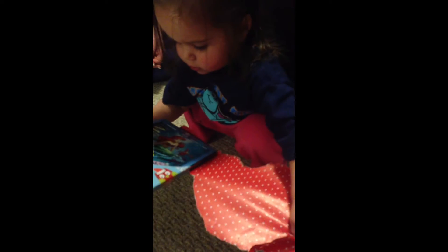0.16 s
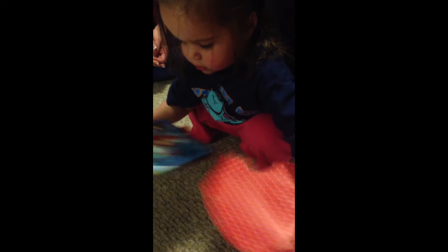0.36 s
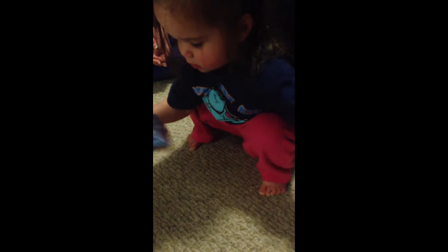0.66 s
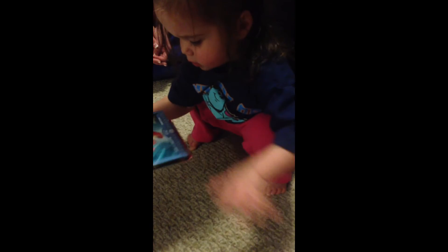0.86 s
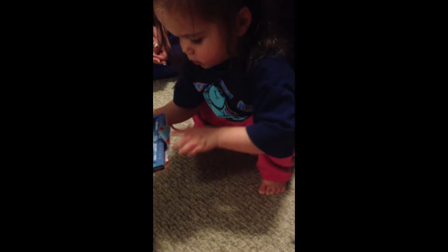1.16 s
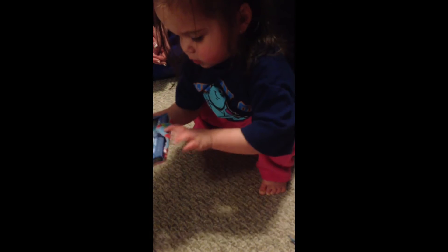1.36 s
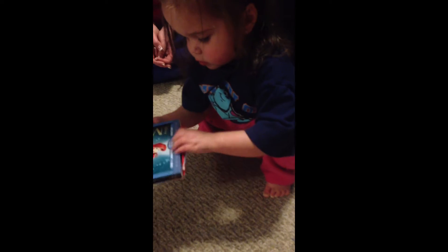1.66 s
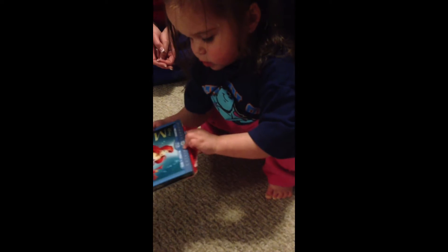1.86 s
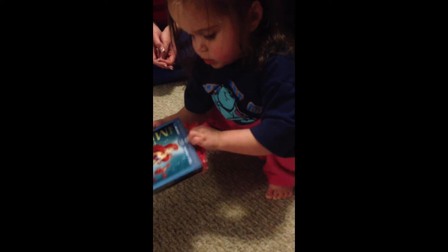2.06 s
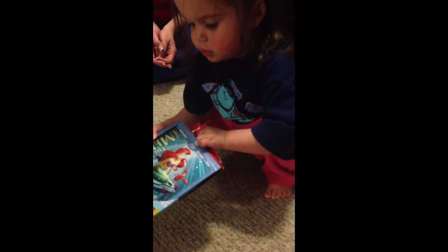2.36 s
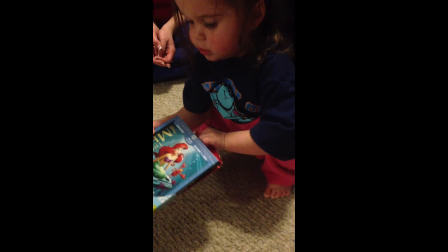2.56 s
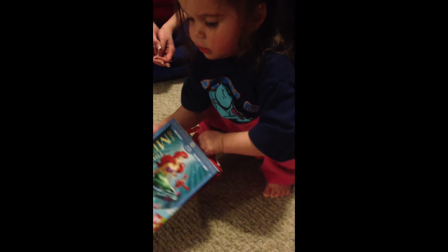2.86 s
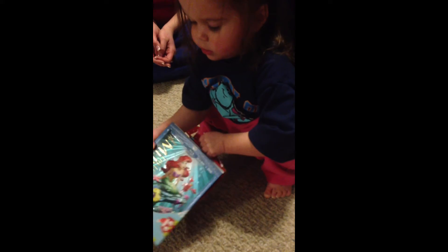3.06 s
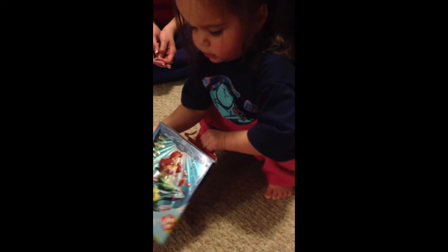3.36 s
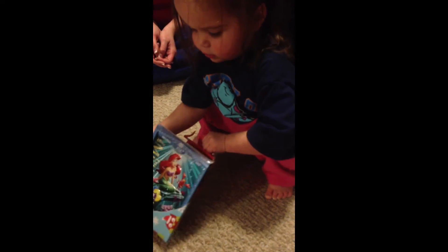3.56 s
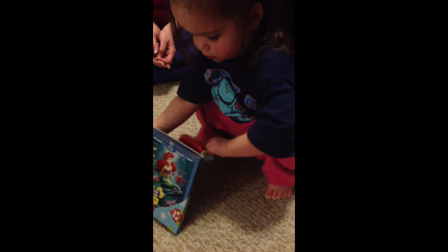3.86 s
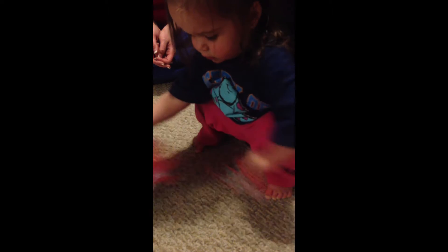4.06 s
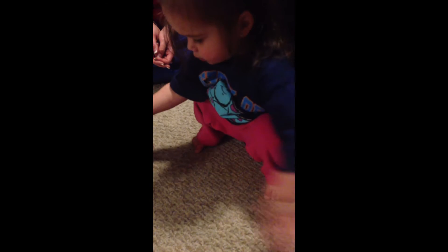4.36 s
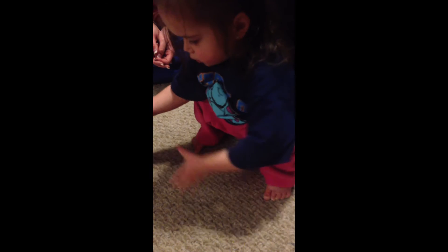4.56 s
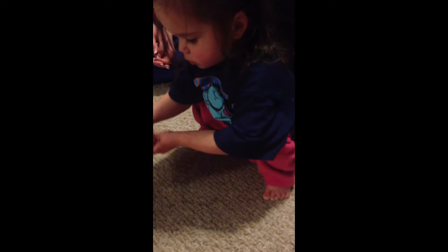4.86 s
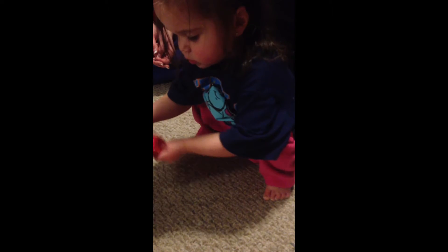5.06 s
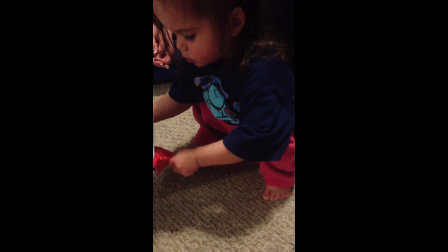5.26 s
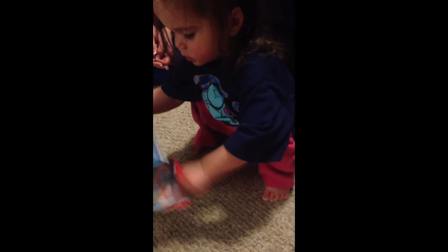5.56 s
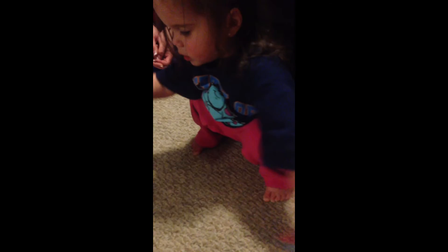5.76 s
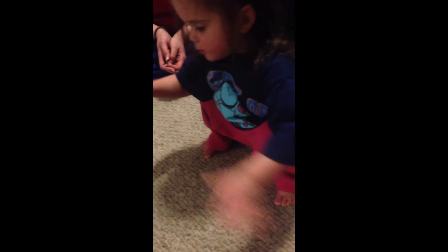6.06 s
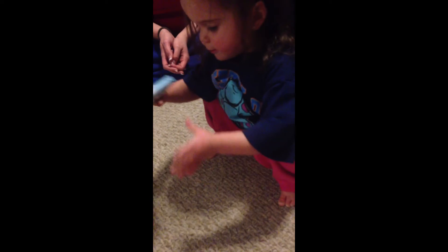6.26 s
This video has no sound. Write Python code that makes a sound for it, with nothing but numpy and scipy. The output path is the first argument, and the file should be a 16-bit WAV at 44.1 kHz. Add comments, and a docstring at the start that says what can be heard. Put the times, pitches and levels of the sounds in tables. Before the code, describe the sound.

A short, sharp tear of wrapping paper opens, followed by dull, gentle thuds of knees and feet on carpet. Creases snap and the paper rustles while fingers tick against a plastic case. Another brief rip comes past the middle, then busier crinkling with quick tears and a few more soft thuds. The sound is close and fairly dry, on a small microphone in a living room with a low, steady hum.

```python
"""A quiet, carpeted living room: a child pulls wrapping paper off a plastic disc case.
Each short rip is a run of breaking fibres that crack, rasp and shake the loose sheet.
Between rips, creases snap, the paper rustles, fingers tap the case and knees and feet bump the floor.
An appliance hums over steady room noise."""
import sys
import numpy as np
from scipy import signal
from scipy.fft import rfft, irfft
from scipy.io import wavfile
from scipy.ndimage import uniform_filter1d

SR = 44100
rng = np.random.default_rng(int(sys.argv[2]) if len(sys.argv) > 2 else 0)


def transcribe(signal):
    """Save signal, clipped to [-1, 1], as a 16-bit WAV file at the path in sys.argv[1]."""
    frames = np.atleast_2d(signal).T
    limited = np.clip(frames, -1, 1)
    pcm = np.round(limited * 32767).astype(np.int16)
    wavfile.write(sys.argv[1], SR, pcm)


N = 283122


# Each row: start in s, end in s, final level in dB, swell up to it in dB, drop on letting go in dB,
# then sheet flap, rasp and fizz in dB re the level, sheet pitch in Hz.
TEARS = [(0.307, 0.3661, -27, 8.5, 16, -10, -10, -17.5, 332),
         (3.848, 3.878, -48.5, 0.5, -5, -22, -3, -26, 570),
         (3.895, 4.006, -28.5, 6.5, 1.5, -10.5, -5.5, -20, 470),
         (5.359, 5.38, -36.5, 3.5, 2.5, -7, -0.5, -24, 620),
         (5.504, 5.557, -27.5, 17.5, 4.5, -8.5, -3, -21.5, 465),
         (5.6104, 5.632, -38, -2.5, 11, -16.5, -4, -18, 500)]
def rip(start_s, end_s, top_db, swell_db, drop_db, flap_db, rasp_db, fizz_db, sheet_hz):
    """A tear runs through the fibres as the pull builds; each break cracks, rasps and tugs the sheet."""
    let_go_s, crackle_fade_db_per_s, shake_fade_db_per_s = 0.0087, 440, 394
    flap_growth_db, fizz_growth_db = 6, 4  # more sheet comes free, the tear quickens
    t = np.arange(start_s, end_s + 0.1, 1 / SR)
    share_left = np.maximum(end_s - t, 0) / (end_s - start_s)
    after_s = np.maximum(t - end_s, 0)
    pull_db = top_db - swell_db * share_left - drop_db * np.minimum(after_s / let_go_s, 1)
    crackle_db = pull_db - crackle_fade_db_per_s * after_s
    shake_db = pull_db - shake_fade_db_per_s * after_s
    sizzle_db = crackle_db + fizz_db - fizz_growth_db * share_left
    breaks = fibres(len(t), per_s=2800)
    shaking = signal.fftconvolve(breaks, sheet())[:len(t)]
    tugs = unit_rms(resonate(shaking, sheet_hz, width_hz=350))
    tugs *= amp(shake_db + flap_db - flap_growth_db * share_left)
    out = np.zeros(len(t) + 1024)
    add(out, 0, tugs * signal.windows.tukey(len(t), 0.04))
    # About 300 times a second the tear switches among eight timbres.
    switches = np.cumsum(rng.random(len(t)) < 300 / SR)
    timbre = rng.integers(0, 8, len(t))[switches % len(t)]
    for k, shift in enumerate(rng.standard_normal(8)):
        bright = crack(6400 * np.exp(0.2 * shift), ring_share=0.98)
        voices = [(bright, crackle_db - 1), (rasp(), shake_db + rasp_db), (fizz(), sizzle_db)]
        for colour, db in voices:
            add(out, 0, signal.fftconvolve(breaks * (timbre == k) * amp(db), colour))
    # One snap opens the tear; another ends it as the freed sheet jerks.
    catch_db = top_db - swell_db + 20
    add(out, 0, snap(catch_db, 7100, rasp_db - 13, thump_db=catch_db + THUMP_RE_CRACK_DB))
    add(out, end_s - start_s, snap(top_db + 18, 7100, rasp_db, thump_db=top_db + flap_db + 20))
    return out


THUMP_RE_CRACK_DB = -16.5
def snap(level_db, ring_hz, rasp_db, thump_db):
    """A crease buckles with a sharp tip and a bright crack; the folds and the sheet answer more slowly."""
    out = np.zeros(1500)
    add(out, 0, amp(level_db - 22) * slips(fizz(), rise_s=0.00034))
    add(out, 0, amp(level_db) * slips(crack(ring_hz, ring_share=0.93), rise_s=0.00099))
    add(out, 0, amp(level_db + rasp_db) * slips(rasp(), rise_s=0.0023))
    add(out, 0, amp(thump_db) * unit_energy(np.convolve(sheet(), mode(hz=562, t60_s=0.01))))
    return out


# Each row: start in s, crack level in dB, ring in Hz, rasp in dB re the crack.
CREASE_POPS = [(0.177, -19.5, 7100, -15), (0.3325, -7, 7040, -9), (0.3583, -12.5, 7150, -3.5),
               (1.5531, -37, 7090, -4), (2.0433, -27, 6500, -3), (2.088, -10, 6860, -23),
               (2.5057, -18.5, 7100, -10), (2.9045, -26, 7700, -3), (3.046, -35.5, 7240, -4),
               (3.157, -21, 7400, -7.5), (3.1986, -25, 5940, -6), (3.2358, -8, 7100, -19.5),
               (3.4653, -33, 6350, -10), (3.5232, -18.5, 8300, -14), (3.5923, -26, 6650, -8.5),
               (3.679, -22, 7440, -10.5), (3.8, -18, 7100, -13.5), (3.8818, -9.5, 6600, -5),
               (3.9053, -11.5, 6300, 3), (3.923, -9.5, 7070, 0), (3.985, -7, 7000, -17),
               (4.2176, -28, 7340, -27), (4.8123, -34, 6800, 2.5), (4.8743, -22, 6250, -12),
               (5.061, -29.5, 6100, -8), (5.13, -20, 6700, -3.5), (5.1386, -23, 6800, -7),
               (5.2374, -33, 7000, 7.5), (5.2507, -34, 6000, 13), (5.3095, -9.5, 7300, -6.5),
               (5.319, -17, 6300, -11), (5.3274, -14, 7020, -9), (5.3376, -14, 6800, -8),
               (5.3999, -13.5, 7100, -24), (5.5145, -13, 6790, -19), (5.5413, -11, 6600, -1),
               (5.741, -28.5, 7240, -3), (6.0533, -29.5, 6800, -5.5), (6.115, -20.5, 7200, -2.5)]
def creases():
    """Single creases pop, each nudging the whole sheet."""
    out = np.zeros(N)
    for start_s, level_db, ring_hz, rasp_db in CREASE_POPS:
        add(out, start_s, snap(level_db, ring_hz, rasp_db, level_db + THUMP_RE_CRACK_DB))
    return out


# Each row: start in s, length in s, level in dB.
HANDLING = [(0.432, 0.081, -71), (0.567, 0.092, -65.5), (0.777, 0.057, -66.5), (1.683, 0.12, -69.5),
            (2.033, 0.1, -57), (2.476, 0.044, -54), (3.437, 0.27, -63), (4.045, 0.076, -58),
            (4.171, 0.2, -64.5), (4.77, 0.15, -61.5), (5.009, 0.16, -56.5), (5.133, 0.04, -54.5),
            (5.304, 0.045, -40.5), (5.379, 0.053, -42), (5.44, 0.2, -56.5), (5.649, 0.15, -58),
            (5.912, 0.05, -61)]
def rustle(length_s, level_db):
    """Sparse tiny creases give way under the fingers in one swell, each in one of five timbres."""
    t = np.arange(0, length_s, 1 / SR)
    swell_db = np.interp(t / length_s, [0, 0.22, 1], [-5.5, 0, -5.5])
    uneven_db = rng.uniform(-4, 4, len(t))
    clicks = amp(level_db + swell_db + uneven_db) * fibres(len(t), per_s=260)
    timbre = rng.integers(0, 5, len(t))
    out = np.zeros(len(t) + 1024)
    for k, shift in enumerate(rng.standard_normal(5)):
        bright = crack(6400 * np.exp(0.22 * shift), ring_share=0.84)
        for colour, db in [(bright, -3), (rasp(), -6), (sheet(), -11)]:
            add(out, 0, amp(db) * signal.fftconvolve(clicks * (timbre == k), colour))
    return out


def fibres(samples, per_s, spread_db=1.5):
    """Fibres give way as random clicks of uneven size, with a steady mean power."""
    size = amp(spread_db * np.minimum(rng.exponential(1, samples), 4))
    clicks = size * rng.choice([-1, 1], samples) * (rng.random(samples) < per_s / SR)
    power = uniform_filter1d(clicks ** 2, size=700)
    return clicks / np.sqrt(abs(power) + 0.1 * np.mean(clicks ** 2) + 1e-9)


def slips(colour, rise_s):
    """A burst of tiny slips, a few milliseconds long, excites the impulse response colour."""
    age = np.arange(400) / SR / rise_s
    burst = rng.standard_normal(len(age)) * age * np.exp(-age)
    return unit_energy(np.convolve(burst, colour))


# Each row: frequency in Hz, relative level in dB. The 7 kHz peak is the microphone's port resonance.
CRACK_SPECTRUM = [(1500, -46.5), (3000, -23), (4200, -12), (5600, -5.5), (6400, 1), (7000, 8), (7600, 3.5),
                  (8500, -4.5), (10000, -14), (13000, -50), (15500, -49)]
def crack(ring_hz, ring_share):
    """A bright paper crack with a short ring near 7 kHz, coloured by the small microphone's resonance."""
    ring = mode(ring_hz, t60_s=0.00099)
    ring *= ring_share * 2 / np.sum(abs(ring))
    ring[0] += 1
    return unit_energy(np.convolve(impulse_response(CRACK_SPECTRUM), ring))


# Each row of both: frequency in Hz, relative level in dB.
RASP_SPECTRUM = [(60, -46), (400, -28.5), (800, -7.5), (1300, -4.5), (1600, -3.5), (2000, 4.5), (2700, 3),
                 (3400, 0), (4300, -1), (6500, -12.5), (12000, -79)]
FOLD_MODES = [(770, -7.5), (1050, -7), (1430, -10), (1900, -3), (2170, -5.5), (2680, -5.5), (3350, -2.5)]
def rasp(fold_db=-6, detune=0.083):
    """The mid-range voice of the sheet; its stiff folds ring a little differently at each bend."""
    folds = np.zeros(1024)
    for hz, db in FOLD_MODES:
        bend, side = rng.standard_normal(2)
        add(folds, 0, amp(db) * np.sign(side) * unit_energy(mode(hz * (1 + detune * bend), t60_s=0.012)))
    out = amp(fold_db) * unit_energy(folds)
    add(out, 0, impulse_response(RASP_SPECTRUM))
    return unit_energy(out)


# Each row: frequency in Hz, relative level in dB.
FIZZ_SPECTRUM = [(6000, -18.5), (8800, 1), (11000, 1.5), (13500, -9), (15500, -22)]
def fizz():
    """The high treble of one break."""
    return impulse_response(FIZZ_SPECTRUM)


# Each row: frequency in Hz, relative level in dB.
SHEET_SPECTRUM = [(30, -58), (70, -23), (150, -4.5), (280, 1.5), (500, -0.5), (740, -2.5), (950, -22),
                  (1600, -37), (6000, -58)]
def sheet():
    """The low response of the loose sheet to one tug."""
    return impulse_response(SHEET_SPECTRUM)


# Each row: start in s, level in dB, ring in Hz.
FINGER_TAPS = [(0.237, -45.5, 635), (0.316, -29, 355), (0.457, -49, 2600), (2.051, -49, 554),
               (2.088, -39, 1885), (2.169, -52, 597), (2.77, -49.5, 630), (3.236, -37, 460),
               (3.49, -47, 2660), (3.862, -32.5, 587), (5.177, -47, 730), (5.265, -40, 530),
               (5.379, -26, 554), (5.795, -47.5, 715), (5.81, -45, 1830)]
def case_taps(ring_db=-2, click_db=4):
    """Fingers knock on the plastic case: a click and a short ring."""
    out = np.zeros(N)
    for start_s, db, hz in FINGER_TAPS:
        add(out, start_s, amp(db + ring_db) * mode(hz, t60_s=0.024))
        add(out, start_s, amp(db + click_db) * slips(rasp(), rise_s=0.00081))
    return out


# Each row: start in s, level in dB, pitch in Hz.
FLOOR_BUMPS = [(1.325, -44.5, 248), (1.443, -43, 167), (1.528, -46, 152), (5.798, -43, 188),
               (5.871, -43.5, 166), (5.949, -45.5, 185)]
def floor_bumps(gain_db=-1, cushion_s=0.0013):
    """Shifting knees and feet thud on the floor; the carpet softens the attack."""
    out = np.zeros(N)
    for start_s, db, hz in FLOOR_BUMPS:
        thud = mode(hz, t60_s=0.088)
        cushion = 1 - np.exp(-np.arange(len(thud)) / SR / cushion_s)
        add(out, start_s, amp(db + gain_db) * thud * cushion)
    return out


# Each row: frequency in Hz, T60 in s.
ROOM_DECAY = [(200, 0.14), (1000, 0.26), (3000, 0.22), (7000, 0.17), (14000, 0.12)]
def room(dry, tail_db=-15, early_db=-17, reflections=8):
    """A few near reflections, then a short tail that carpet and sofa soak up."""
    echoes = rng.standard_normal(SR // 2) * (rng.random(SR // 2) < 0.1)
    echoes[:round(0.008 * SR)] = 0
    hz, t, spectra = signal.stft(echoes, SR, nperseg=256)
    decay = np.exp(-np.log(1000) * t / log_interp(ROOM_DECAY, hz)[:, None])
    response = amp(tail_db) * unit_energy(signal.istft(spectra * decay, SR, nperseg=256)[1])
    delays = (rng.uniform(0.002, 0.023, reflections) * SR).astype(int)
    response[delays] += amp(early_db) * unit_energy(rng.choice([-1., 1.], reflections))
    return dry + signal.fftconvolve(dry, response)[:N]


# Each row: centre in Hz, rms level in dB, width in Hz.
MOTOR_LINES = [(161.8, -63.5, 7.9), (243.7, -74.5, 15), (318.3, -70, 20.6), (402.2, -72, 17),
               (2314, -79.5, 400)]
def appliance(mains_hz=119.8, mains_db=-61):
    """Steady mains hum and the wavering lines of a motor."""
    hz = np.fft.rfftfreq(N, 1 / SR)
    out = amp(mains_db) * unit_rms(np.sin(2 * np.pi * mains_hz * np.arange(N) / SR))
    for centre_hz, db, width_hz in MOTOR_LINES:
        out += amp(db) * shaped_noise(1 / (1 + (2 * (hz - centre_hz) / width_hz) ** 2))
    return out


# Each row: frequency in Hz, relative noise density in dB.
AIR_SPECTRUM = [(25, -19), (60, -19.5), (85, -20), (105, -8.5), (180, -6.5), (215, -8.5), (410, -11.5),
                (490, -17.5), (680, -20.5), (900, -26.5), (1600, -29.5), (2600, -25.5), (4800, -29),
                (6200, -30.5), (7200, -27), (8600, -32.5), (15400, -34)]
def room_noise(rms_db=-60):
    """Faint steady noise, strongest in the bass."""
    hz = np.fft.rfftfreq(N, 1 / SR)
    return amp(rms_db) * shaped_noise(amp(log_interp(AIR_SPECTRUM, hz)))


def amp(db):
    """Decibels to gain."""
    return 10 ** (np.asarray(db) / 20)


def unit_rms(x):
    """Scales to rms 1."""
    return x / np.sqrt(np.mean(x ** 2) + 1e-20)


def unit_energy(x):
    """Scales to energy 1."""
    return x / np.sqrt(np.sum(x ** 2) + 1e-20)


def log_interp(points, hz):
    """Reads a curve on a log-frequency axis."""
    point_hz, value = np.transpose(points)
    return np.interp(np.log(hz + 1), np.log(point_hz + 1), value)


def add(mix, start_s, sound):
    """Mixes a sound in at start_s."""
    part = mix[max(round(start_s * SR), 0):][:len(sound)]
    part += sound[:len(part)]


def shaped_noise(gain):
    """Noise of rms 1, weighted by one gain per frequency bin."""
    return unit_rms(irfft(rfft(rng.standard_normal(N)) * gain, N))


def impulse_response(spectrum, size=1024):
    """The minimum-phase response with a given spectrum, at energy 1."""
    hz = abs(np.fft.fftfreq(size, 1 / SR))
    log_gain = np.log(amp(log_interp(spectrum, hz)))
    transfer = np.exp(np.conj(signal.hilbert(log_gain)))
    return unit_energy(np.fft.ifft(transfer).real[:size // 2])


def mode(hz, t60_s):
    """One dying resonance."""
    t = np.arange(int(t60_s * SR) + 2) / SR
    return np.sin(2 * np.pi * hz * t) * np.exp(-np.log(1000) * t / t60_s)


def resonate(x, hz, width_hz):
    """Passes x through one resonance."""
    radius = np.exp(-np.pi * width_hz / SR)
    pole = radius * np.exp(2j * np.pi * hz / SR)
    return signal.lfilter([1 - radius], [1, -pole], x).real


def scene():
    """Paper and knocks in the room, over hum and room noise."""
    paper = np.zeros(N)
    for start_s, *settings in TEARS:
        add(paper, start_s, rip(start_s, *settings))
    for start_s, length_s, level_db in HANDLING:
        add(paper, start_s, rustle(length_s, level_db))
    paper += creases()
    return (room(paper + case_taps() + floor_bumps()) + appliance() + room_noise())[None]


def record(dry, low_hz=65, high_hz=15450):
    """A small microphone sheds the deep bass; a steep low-pass cuts the top treble."""
    thin = signal.sosfilt(signal.butter(2, low_hz, "highpass", fs=SR, output="sos"), dry)
    lowpass = signal.firwin(511, high_hz, window=("kaiser", 9), fs=SR)
    return signal.oaconvolve(thin, lowpass[None], "same")


dry = scene()
out = record(dry)
transcribe(out)
```